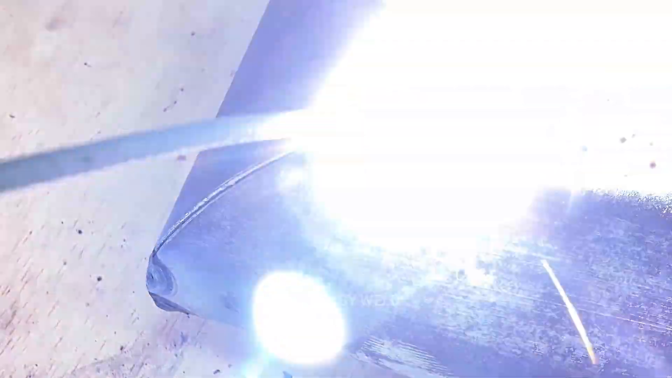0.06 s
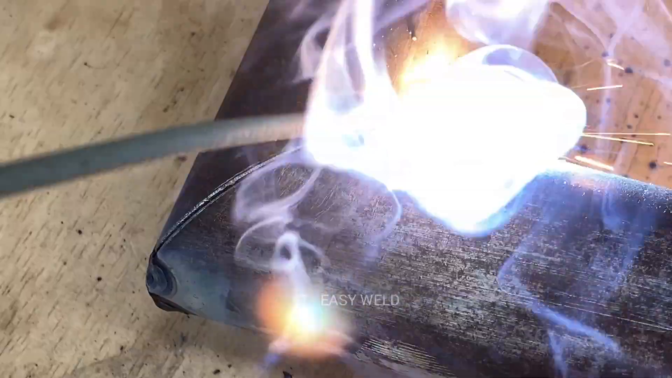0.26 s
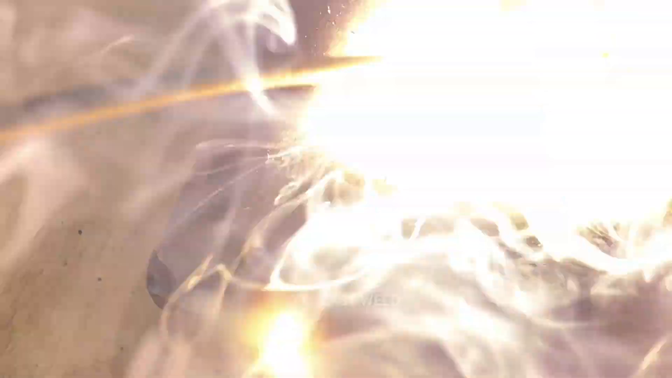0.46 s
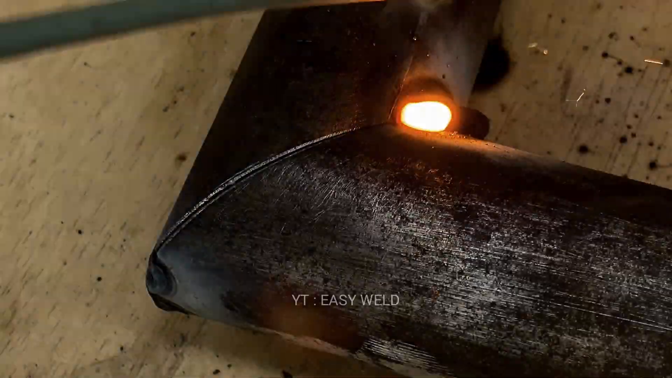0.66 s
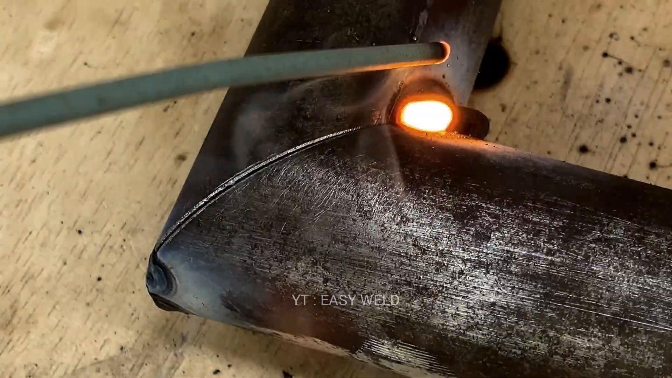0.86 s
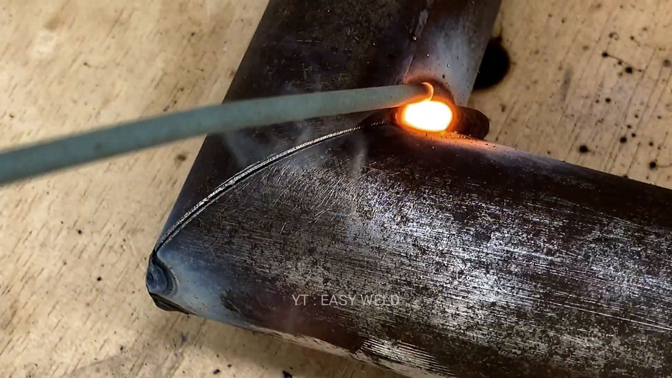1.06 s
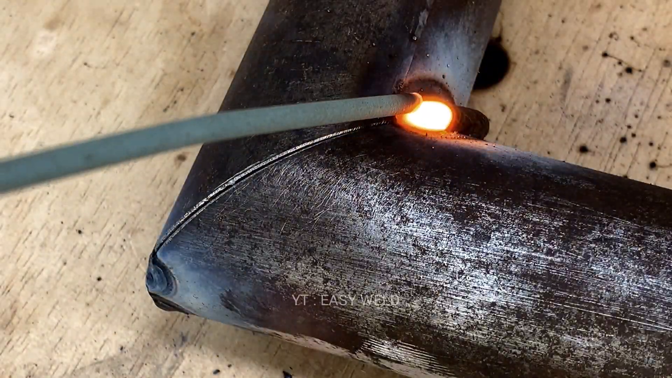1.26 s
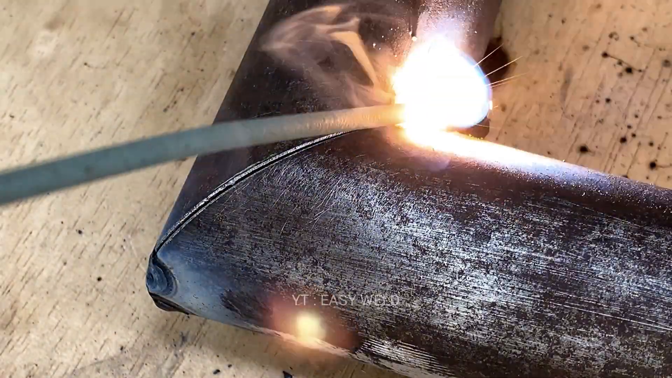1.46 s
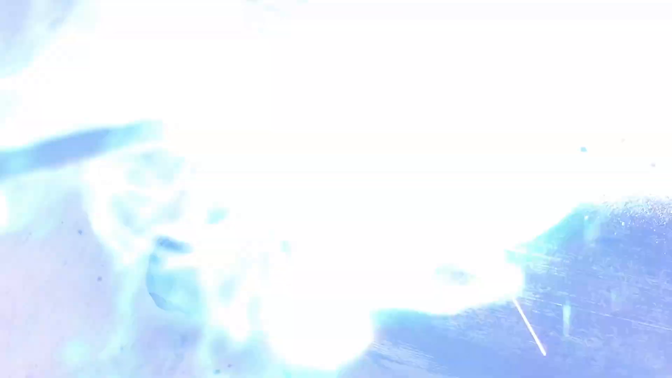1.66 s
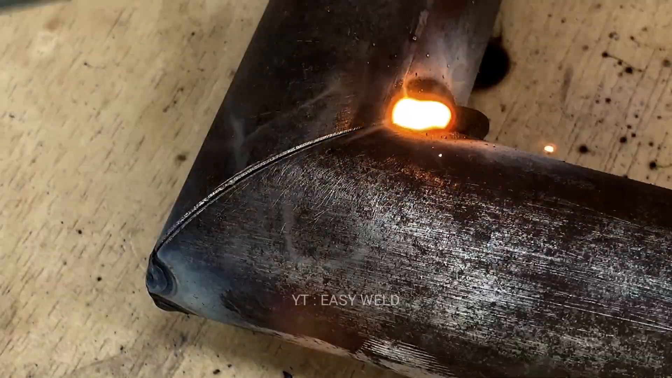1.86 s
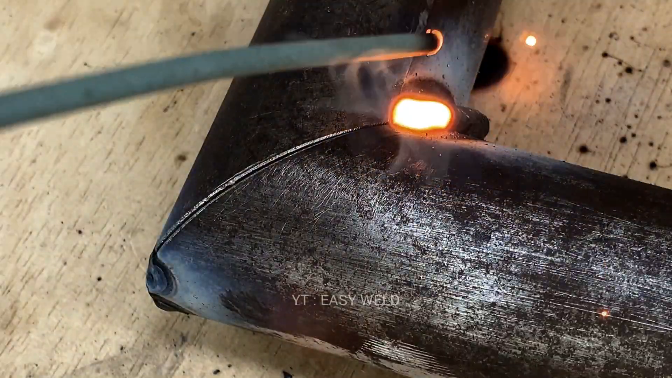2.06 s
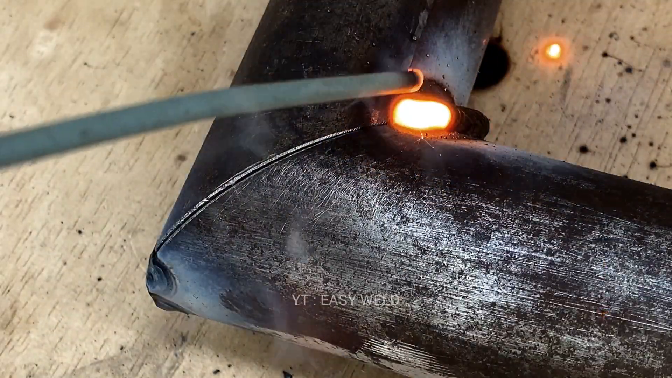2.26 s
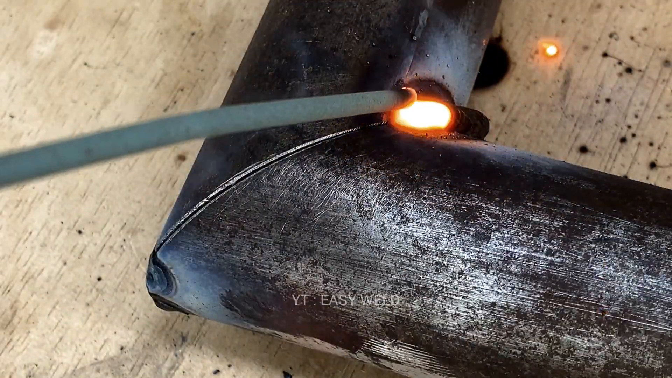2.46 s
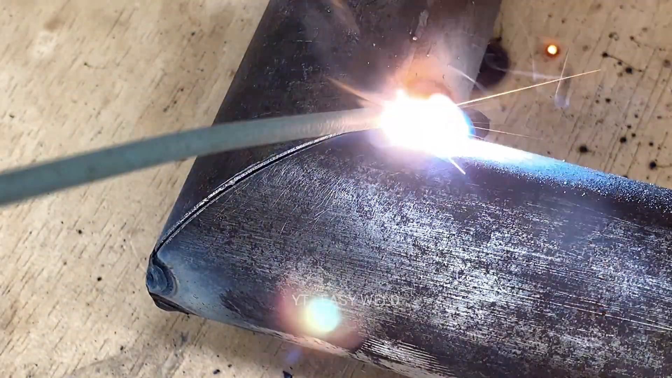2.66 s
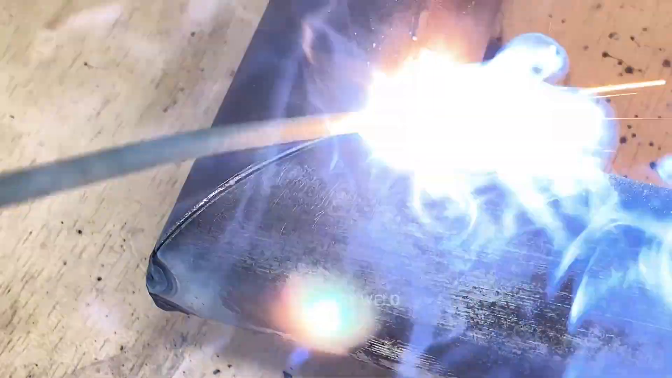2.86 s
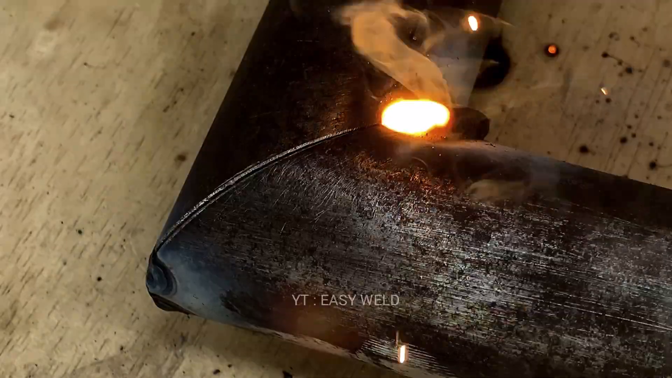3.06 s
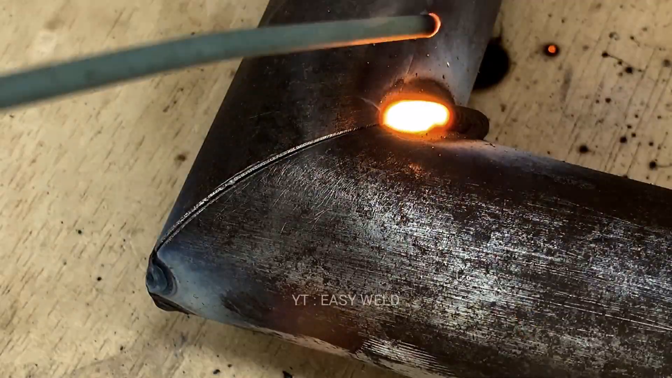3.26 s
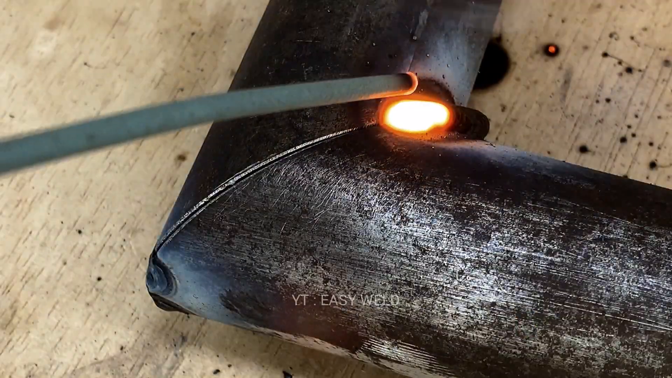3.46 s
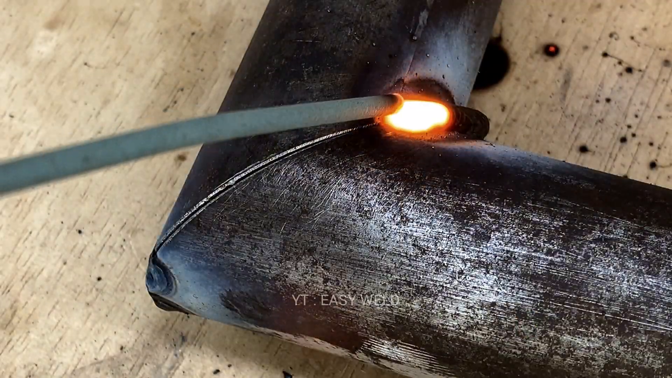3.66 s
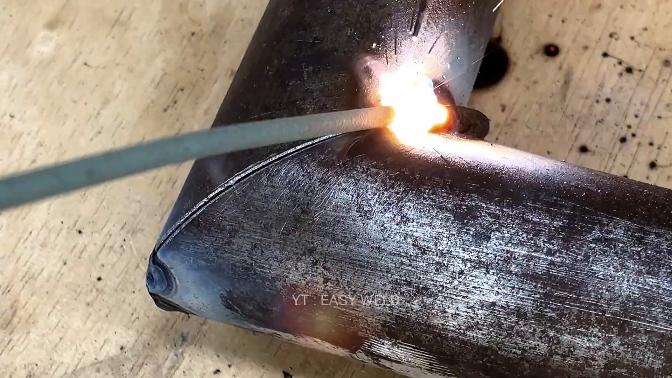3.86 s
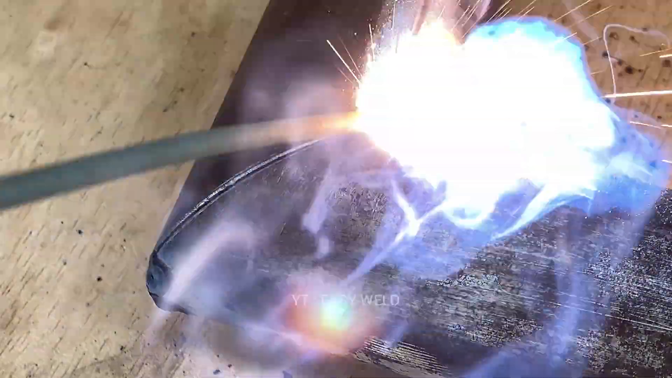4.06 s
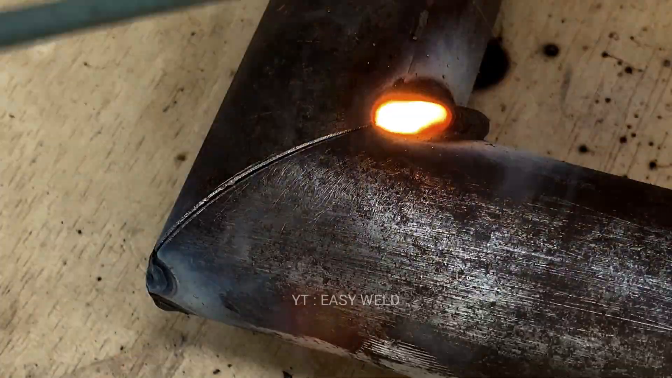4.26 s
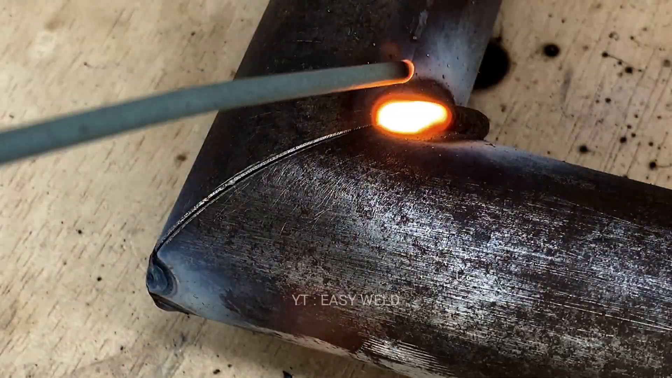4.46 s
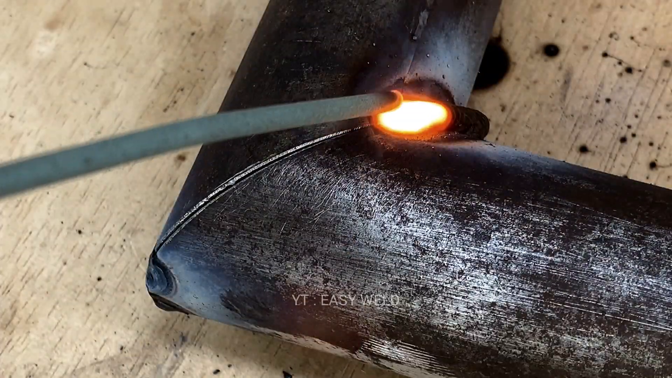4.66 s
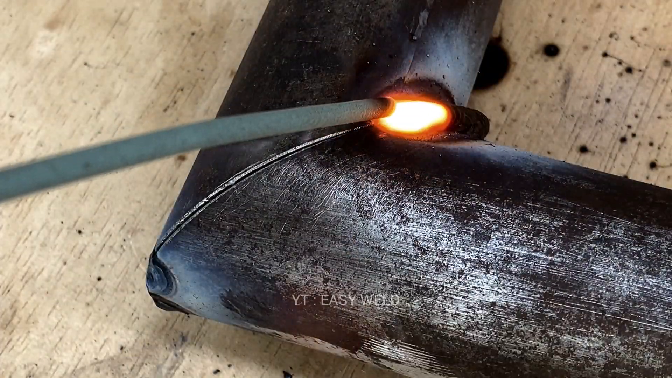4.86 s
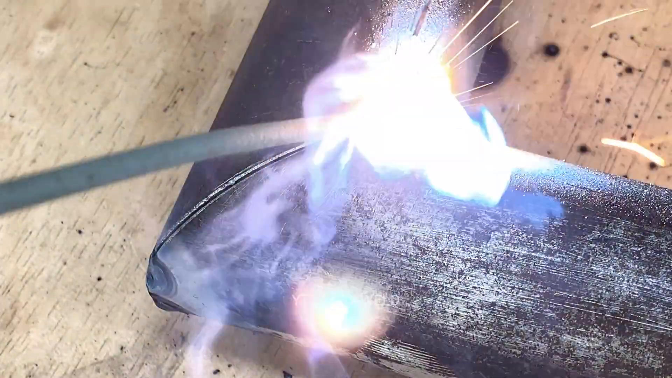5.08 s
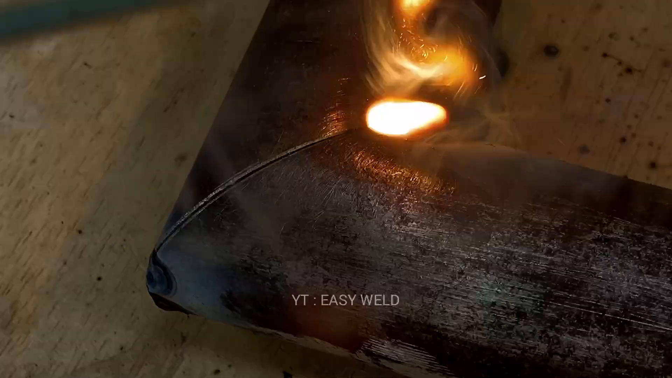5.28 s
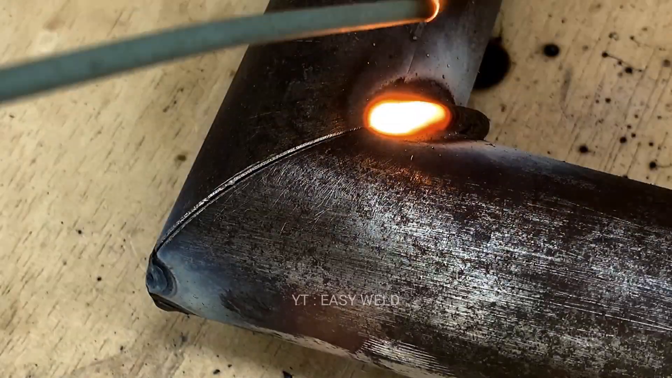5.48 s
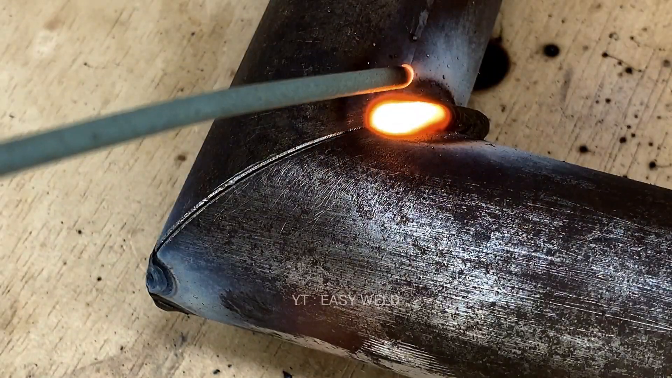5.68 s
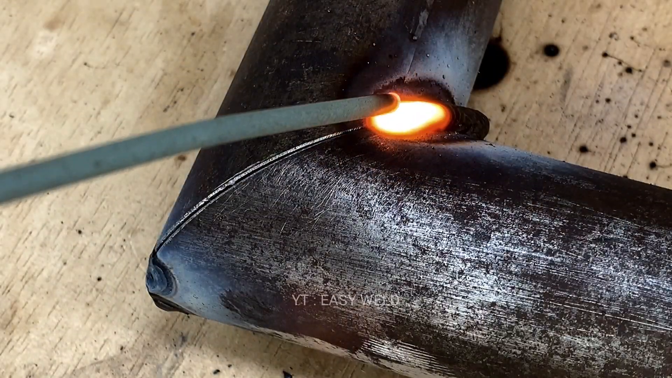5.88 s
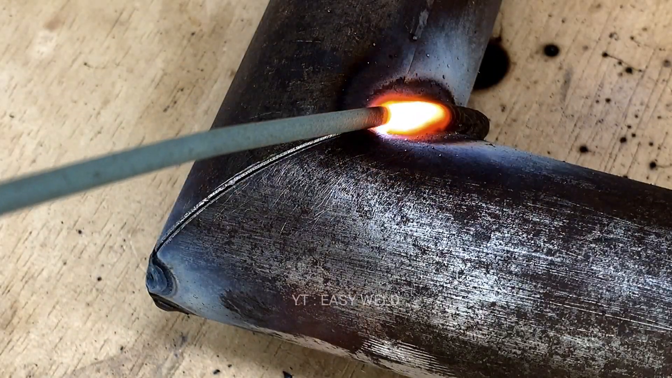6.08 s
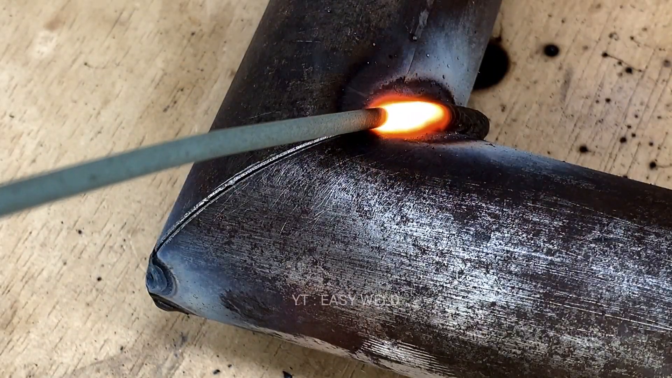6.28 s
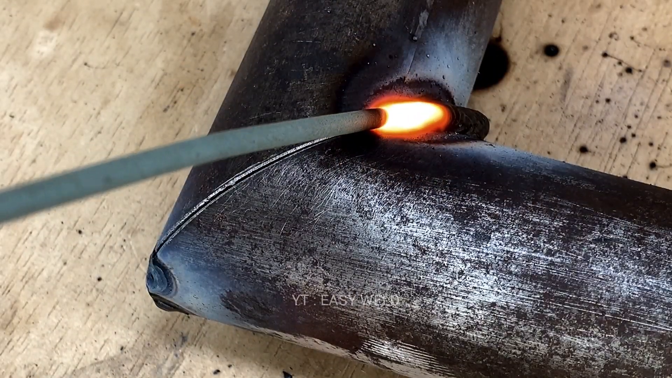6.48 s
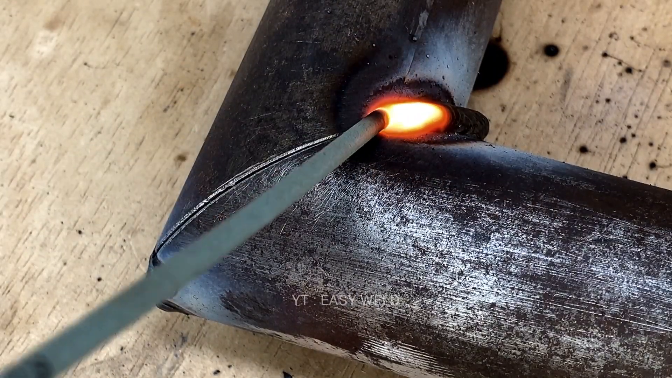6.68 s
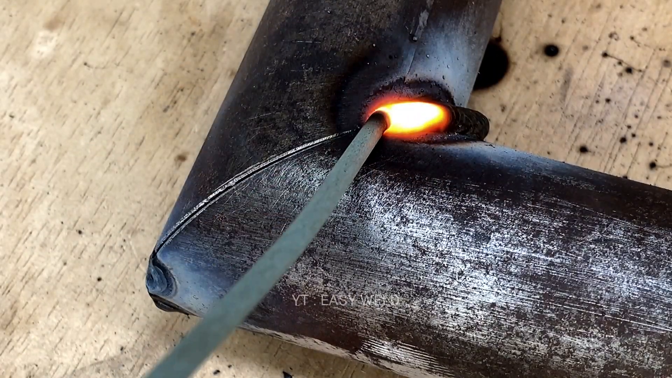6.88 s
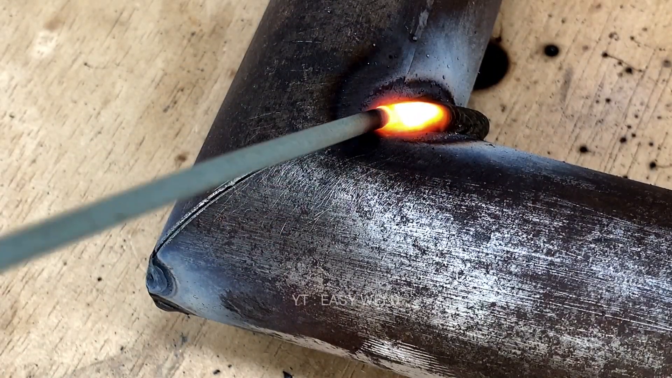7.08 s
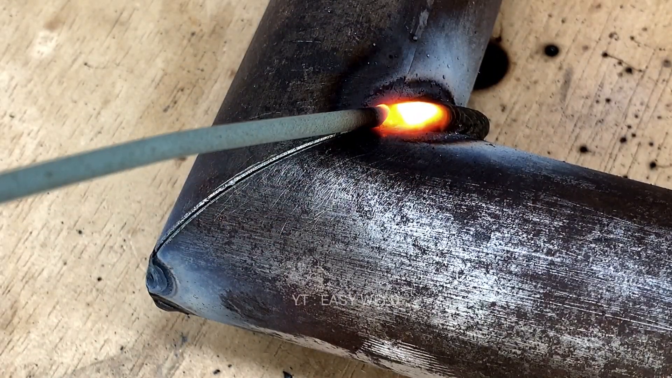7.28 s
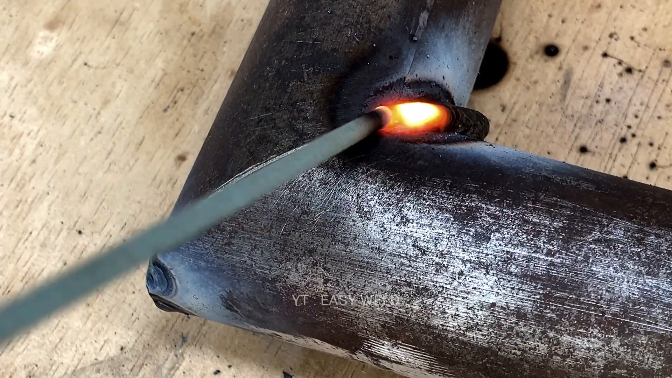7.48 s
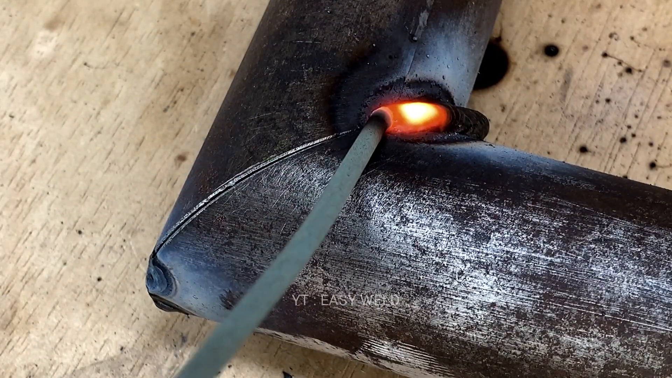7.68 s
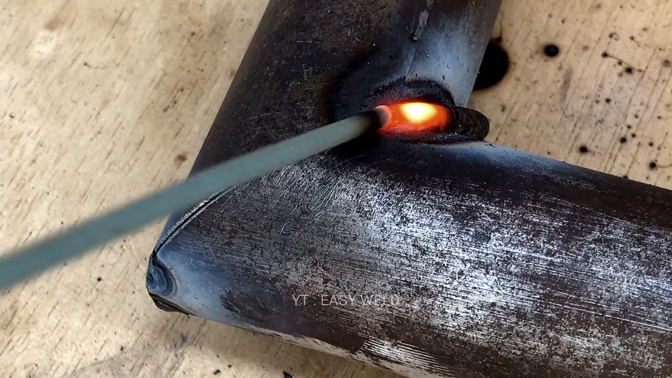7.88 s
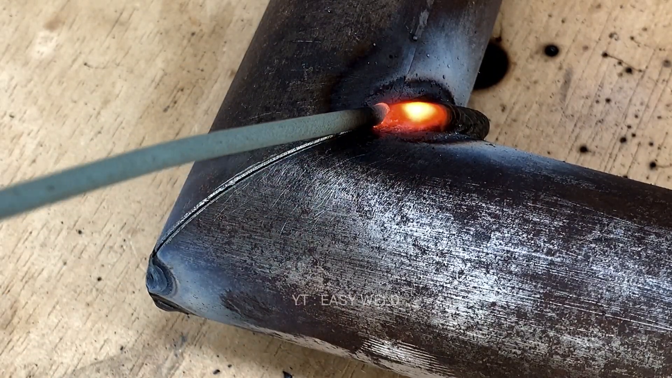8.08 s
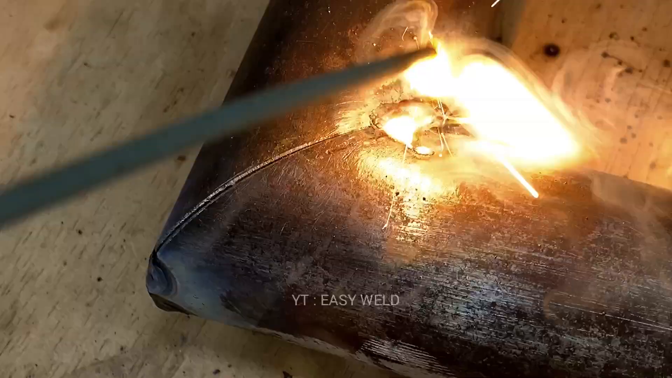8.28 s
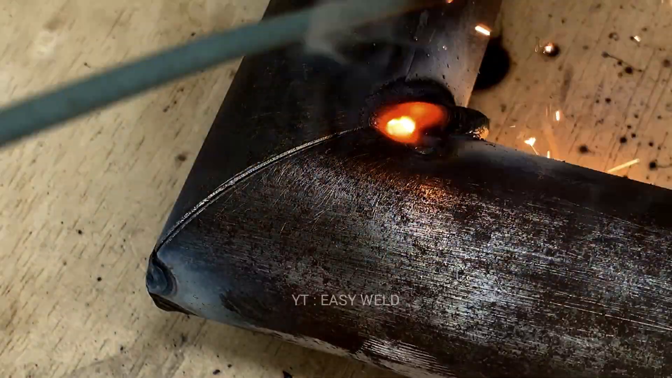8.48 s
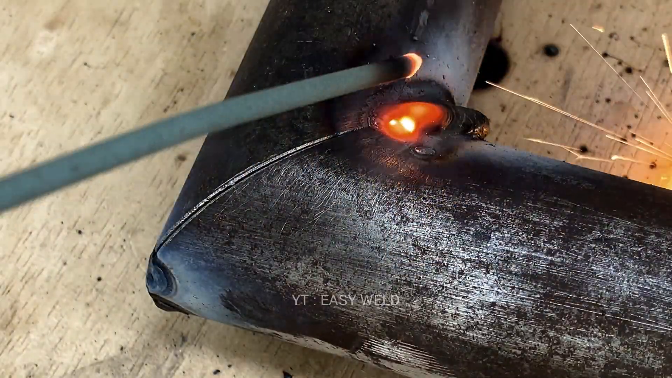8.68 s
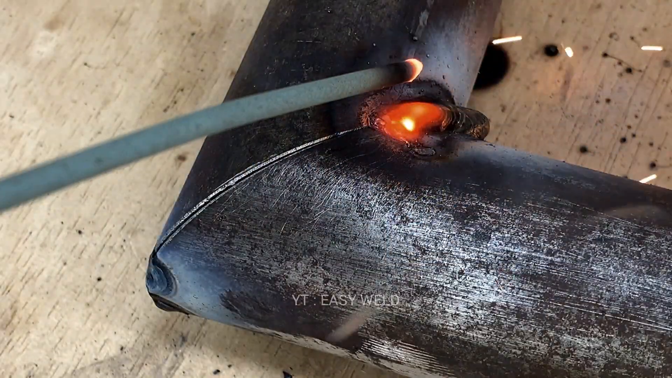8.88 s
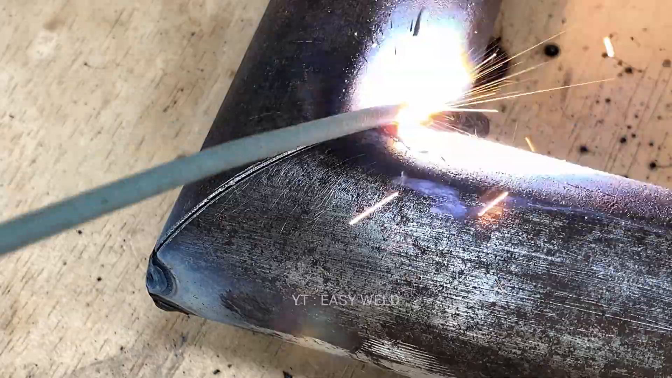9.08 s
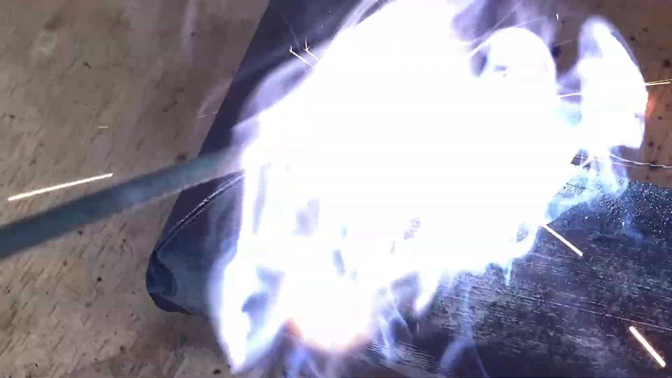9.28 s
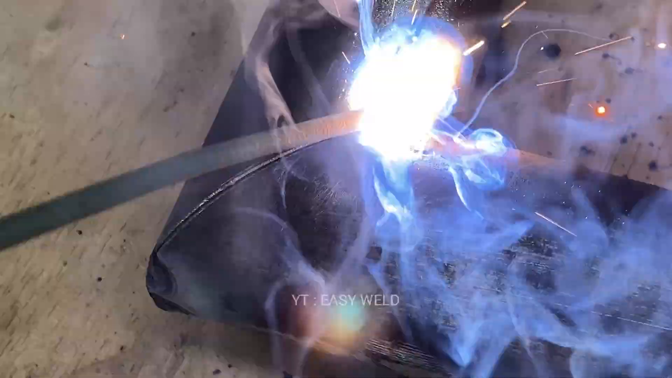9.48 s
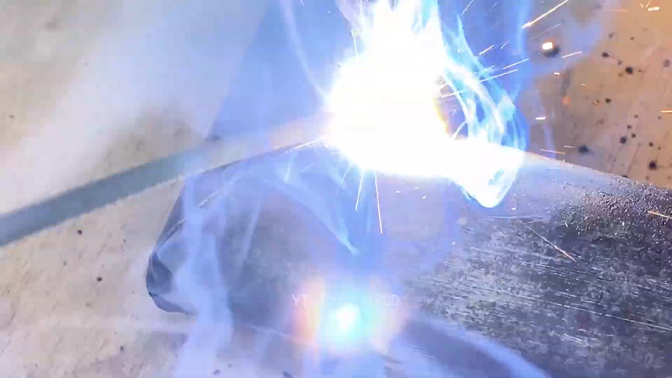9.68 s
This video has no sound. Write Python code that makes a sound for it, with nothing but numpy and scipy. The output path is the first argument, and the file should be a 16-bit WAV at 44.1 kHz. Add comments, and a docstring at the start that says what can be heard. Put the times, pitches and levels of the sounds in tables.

```python
"""Stick welding in a workshop

A rod is touched to steel eight times close to a phone. Each arc is coloured noise roughened by tiny spits, with
short sharp noise pops. Low puffs come as most arcs end, and fine noise sizzles as slag. The rod knocks, cooling
slag ticks and a far bird chirps in gliding sines. Behind lie a resonant noise drone, fan tones, a brief whine and
a low wandering rumble."""
import sys
import numpy as np
from scipy import signal
from scipy.fft import rfft, irfft, next_fast_len
from scipy.io import wavfile
from scipy.ndimage import uniform_filter1d

SR = 44100
rng = np.random.default_rng(int(sys.argv[2]) if len(sys.argv) > 2 else 0)


def wav_out(sig):
    """Save sig, one row per channel (or a flat mono array), as 16-bit PCM at SR to the path in sys.argv[1]."""
    wavfile.write(sys.argv[1], SR, np.round(np.clip(np.atleast_2d(sig).T, -1, 1) * 32767).astype(np.int16))


N = 429534
SIZE = next_fast_len(N + 4096)  # transform length, with room for filter tails
HZ = np.arange(SIZE // 2 + 1) * SR / SIZE
T = np.arange(N) / SR

# Each arc touches and sputters, catches and burns, flares as the rod lifts, and breaks:
# strike t/s; catch, flare, break t/s after it; strike burst, touch, burn, late, flare level/dB before colouring;
# brightness/dB
ARC_STAGES = [(0, 0.15, 0.39, 0.51, -25, -22.5, -17.5, -18, -17, -2.5),
              (1.364, .14, 0.31, .348, -28, -27, -23.5, -25.5, -18, -2),
              (2.592, .11, .398, .424, -34, -28, -24, -19, -18.5, -1),
              (3.809, 0.14, 0.27, .321, -26, -27.5, -20, -20, -15.5, -3),
              (4.958, 0.085, .255, 0.28, -31, -28, -23, -20.5, -15.5, -2),
              (6.079, 0.0082, .037, 0.045, -24.5, -27, -28, -31, -37, 1),
              (8.092, .05, .115, .17, -5.5, -23.5, -16.5, -21.5, -16, -5),
              (9.069, .15, .612, .651, -24, -20, -15.5, -23, -17, -6.5)]
# Pops of droplets and of the arc snapping back, with a few faint lone ticks after the arcs:
# start t/s, peak level/dB before tilt, treble over bass/dB
MAIN_POPS = [(0.0518, -5, -8), (0.1062, -11, 0), (0.173, -7, 0), (0.1781, 0.5, 1), (0.1995, -2.5, 3),
             (0.2433, -13, 0), (0.2818, -9, 0), (0.3031, -3, 1), (0.3413, -4, 4), (0.3611, -4, 0),
             (0.388, -7, 0), (0.4265, 0, 0), (0.4524, -8, 0), (0.4646, -6, 0), (0.4833, -12.5, -3),
             (0.636, -26, -10), (1.3692, -7, -7), (1.3834, -7.5, 0), (1.3958, -3, 4), (1.415, -10, 5),
             (1.4257, -6.5, 5), (1.4384, -12, 2), (1.4865, -13, -3), (1.4974, -13, 0), (1.5349, -8, 0),
             (1.5402, -4.5, 1), (1.5466, -0.5, 1.5), (1.5724, -11, 0), (1.5805, -2, 1), (1.5874, -11, 0),
             (1.6257, -10, 0), (1.6383, -1.5, -1), (1.6628, -9.5, -9), (1.672, -10, -11), (1.6995, -17, -8),
             (1.97, -34, 2), (2.599, -15, 0), (2.6164, -15, 0), (2.686, -14, 0), (2.6949, 0.5, -8),
             (2.7157, -5.5, 2), (2.7304, -14, 0), (2.7397, -4, 4), (2.7468, -9, 0), (2.7636, -9, 0),
             (2.7714, -11, 0), (2.7796, -4, 2), (2.821, -11, 4), (2.8408, -5, 5), (2.8848, -3, 0),
             (2.9016, -4, 3), (2.9477, 0, -2), (2.9839, -4, -0.5), (3.0086, -18, -5), (3.8324, -16, 4),
             (3.8681, -5.5, 4), (3.8784, -5.5, 0), (3.9065, -0.5, -6), (3.9174, -5.5, 0),
             (3.9559, -0.5, 1.5), (3.9967, -1, -4), (4.0004, -11, 0), (4.009, -2, -3), (4.0612, -8, -2),
             (4.0864, -6, 0), (4.6463, -35, -2), (4.9638, -16, -2), (4.9735, -4.5, 3), (5.025, -1.5, 0),
             (5.0484, -4, 0), (5.0652, -3, 0), (5.0913, -5, 2), (5.109, -10, 0), (5.128, -11, 0),
             (5.1348, -7, 0), (5.1637, -9, -3), (5.1729, -7, 3), (5.1826, -2, -1), (5.258, -20, -4),
             (6.0931, -7, 3), (6.1024, -11, -3), (6.115, -9, 3), (8.093, 2.5, -3), (8.1124, -8, -2),
             (8.1464, -1, 2), (8.1684, -16, 0), (8.2275, -3, -6), (8.2661, -16, -11), (8.2701, -18.5, -16),
             (8.4053, -31, -2), (9.0756, -9, -1), (9.1015, -13, 2), (9.1217, -14, 0), (9.1616, -10, -5),
             (9.1995, -7, -2), (9.227, 0, -2), (9.243, -3, -3), (9.2525, -2, -8), (9.2644, -3.5, -6),
             (9.3374, -2, -4), (9.3442, -2, 4), (9.397, -13, -2), (9.416, -13, 0), (9.4564, 1, -3),
             (9.4984, -4, -2), (9.5532, -13, 0), (9.5723, -2, 1), (9.6001, -7, 6), (9.625, -10, 3),
             (9.651, -1.5, 4), (9.6763, -2.5, 3), (9.7094, -22, 0)]


def undb(db):
    """Decibels to gain."""
    return 10 ** (np.asarray(db) / 20)


def level(x, db):
    """Scale to an rms level in dB."""
    return x * undb(db) / np.sqrt(np.mean(x ** 2))


def shape_db(table):
    """Read a table of f/Hz, level/dB on every frequency bin, along log frequency."""
    hz, db = np.transpose(table)
    return np.interp(np.log(HZ + 1), np.log(hz), db)


def causal(db):
    """Minimum-phase response with the given dB gain, from the folded cepstrum."""
    cepstrum = irfft(db * np.log(10) / 20, SIZE)
    cepstrum[1:SIZE // 2] *= 2
    cepstrum[SIZE // 2 + 1:] = 0
    return np.exp(rfft(cepstrum))


def through(x, response):
    """Filter by a frequency response."""
    return irfft(rfft(x, SIZE) * response, SIZE)[..., :N]


def band(x, lo_hz, hi_hz):
    """Gentle band-pass."""
    return signal.sosfilt(signal.butter(2, [lo_hz, hi_hz], "band", fs=SR, output="sos"), x)


def walk(rate):
    """Random levels held 1 / rate s and slewed twice; spread near 1."""
    k = int(SR / rate)
    steps = np.repeat(rng.standard_normal(N // k + 1), k)
    return 1.196 * uniform_filter1d(uniform_filter1d(steps, k), k)[:N]


def tone(hz):
    """Sine that follows a pitch curve in Hz."""
    return np.sin(2 * np.pi * np.cumsum(hz) / SR)


def add(out, s, sound):
    """Mix a sound in at a time in s."""
    i = max(int(s * SR), 0)
    out[i:i + len(sound)] += sound[:N - i]


def drone(drone_db=-39.5, waver_db=.4):
    """Fan and machine noise ringing in room and casing resonances: a common and a scattered part."""
    # Drone between its resonances: f/Hz, level/dB
    floor = [(30, -21), (60, -11.5), (120, -12.5), (160, -11), (300, -10.5), (400, -17.5), (700, -10),
             (800, -17.5), (1150, -19.5), (2050, -22.5), (2800, -27), (5500, -28), (7300, -35),
             (10700, -45), (12000, -48.5), (15500, -51)]
    # Room and casing resonances: f/Hz, width/Hz, rise/dB
    modes = [(220.4, 56, 12.5), (358.6, 16, 8), (404, 32, -13.5), (488.6, 130, 12.5), (617.5, 44, 4),
             (957, 133, 11.5), (1400, 30, -5.5), (1656, 112, 12.5), (1913, 62, 7.5), (2370, 117, 8.5),
             (3166, 120, 8.5), (4300, 65, 3.5), (4880, 360, 6.5), (6070, 150, 4.5), (6480, 340, 5.5),
             (10370, 1700, 8.5)]
    db = shape_db(floor)
    for hz, width, rise_db in modes:
        db = db + rise_db / (1 + (2 * (HZ - hz) / width) ** 2)
    noise = through(rng.standard_normal((2, N)), undb(db))
    return level(noise, drone_db) * undb(waver_db * walk(5))


def fan_tones():
    """Blade tones of the fan: steady sines whose pitch wanders by about 1 Hz."""
    # Blade tones: f/Hz, rms level/dB
    lines = [(706, -66), (1412, -72), (2383, -75)]
    return sum(level(tone(hz + walk(3.71)), db) for hz, db in lines)


def rumble(throb_db=3):
    """Low throbbing sine whose pitch wanders as it comes and goes."""
    # Rumble curve: t/s, f/Hz, rms level/dB
    curve = [(0, 71.8, -53), (.73, 72.7, -49.5), (1.52, 74, -50), (2.36, 73, -56.5), (3.03, 64, -51),
             (3.5, 63.7, -57.5), (4.5, 70, -55), (5.6, 59.95, -58), (8.4, 60, -53), (8.7, 62, -63),
             (9.3, 87.9, -49.5), (9.74, 85.9, -54)]
    s, hz, db = np.transpose(curve)
    wander = np.interp(T, s, hz) * (1 + .06 * walk(12))
    throb = level(undb(throb_db * walk(12)) * tone(wander), 0)
    return throb * undb(np.interp(T, s, db))


def spits(rate, size_db, scatter_db, tail_s):
    """Noise roughened by a rain of tiny spits, most small and a few large, each smeared by a short tail."""
    sizes = undb(size_db + abs(scatter_db) * rng.exponential(size=N))
    hits = (rng.random(N) < rate / SR) * sizes
    swell = 1 + signal.lfilter([1], [1, -np.exp(-1 / (tail_s * SR))], hits)
    return level(swell * rng.standard_normal(N), 0)


def burning(strike_s=0.012, catch_s=0.024, sag_s=0.14, flare_s=0.031, break_db=-13, dip_s=.006, dip_db=-2.5):
    """Hiss level and brightness in dB through every arc: a short arc is bright, a stretched one dull."""
    # A droplet bridges the gap and the hiss sinks: t/s, length/s, depth/dB
    shorts = [(0.032, 0.0081, -8.5), (1.44, .005, -13), (1.633, .005, -11), (2.645, 0.011, -17),
              (2.824, 0.0163, -23), (8.171, 0.013, -17)]
    hiss_db, bright_db = np.full(N, -120.), np.zeros(N)
    for strike, catch, flare, end, strike_db, touch_db, burn_db, late_db, flare_db, bright in ARC_STAGES:
        on = (T >= strike) & (T <= strike + end)
        t = T[on] - strike
        rise = max(flare - flare_s, catch)
        # touch, burn, sag to the late level, hold, flare, break
        times = [catch - catch_s, catch, min(catch + sag_s, rise), rise, flare, end]
        levels = [touch_db, burn_db, late_db, late_db, flare_db, flare_db + break_db]
        steady = undb(np.interp(t, times, levels))
        burst = undb(strike_db) * np.exp(-(t / strike_s) ** 2)
        hiss_db[on] = 10 * np.log10(steady ** 2 + burst ** 2)
        bright_db[on] = bright + np.interp(t, times, [2, 0, 0, 0, -5, -10])
    for s, length, depth_db in shorts:
        hiss_db += depth_db * np.clip(np.minimum(T - s, s + length - T) / .0015 + .5, 0, 1)
    # the hiss sinks just before each main pop, by dip_db for a pop of 0 dB
    for s, db, _ in MAIN_POPS:
        i = int(s * SR)
        hiss_db[i - int(dip_s * SR):i] += dip_db * undb(db)
    return hiss_db, bright_db


def crackle(bright_db, per_s=30, top_db=-12.5, mean_fall_db=4, tint_spread_db=2):
    """Smaller pops at chance moments from strike to flare: rows of t/s, peak level/dB, brightness/dB."""
    rows = []
    for strike, _, flare, *_ in ARC_STAGES:
        when, size, tint = rng.random((int(per_s * flare), 3)).T
        s = strike + when * flare
        tint_db = bright_db[(s * SR).astype(int)] + tint_spread_db * (2 * tint - 1)
        rows += zip(s, top_db + mean_fall_db * np.log(size), tint_db)
    return rows


def pop_layers(pops, colour, swell_s=0.00035, snap_s=0.00039, fizz_s=0.0099, fizz_db=-18, crack_db=11, thin_hz=1900):
    """Noise that swells quickly to one sharp crack, then a fizz; returns its bass and treble feeds."""
    lead = 44  # samples of swell before the crack
    t = T[:800] - lead / SR
    decay = np.exp(-t / snap_s) + undb(fizz_db) * np.exp(-t / fizz_s)
    envelope = np.where(t < 0, np.exp(t / swell_s), decay)
    # how high a unit click peaks once coloured, to allow for it in the pop levels
    crack_peak = np.max(np.abs(band(irfft(colour, SIZE), thin_hz, 19800)))
    low, high = np.zeros((2, N))
    for (s, db, bright), noise in zip(pops, rng.standard_normal((len(pops), len(t)))):
        snap = envelope * noise + (t == 0) * np.sign(noise) * undb(crack_db)
        snap *= undb(db) / np.max(np.abs(snap)) / crack_peak
        add(low, s, snap * undb(-bright / 2))
        add(high, s, snap * undb(bright / 2))
    return band(low, thin_hz, 20000), high  # so small a burst moves little bass


def arc(waver_db=0.96, flicker_db=2.0, split_hz=5960):
    """Hissing plasma and spitting metal share one colour, whose treble half opens and closes."""
    # Arc colour: f/Hz, level/dB
    arc_colour = [(60, -6.5), (500, -9), (1400, -8), (1900, -12.5), (2400, -7.5), (3600, -3), (4900, 0),
                  (5800, -2.5), (6600, 0), (7700, -6.5), (9000, -1), (10700, -1), (11700, -7.5),
                  (15500, -14.5)]
    hiss_db, bright_db = burning()
    unsteady_db = waver_db * walk(60) + flicker_db * walk(250)
    hiss = spits(700, 3.1, 3.32, 0.00016) * undb(hiss_db + unsteady_db)
    colour = causal(shape_db(arc_colour))
    low, high = pop_layers(list(MAIN_POPS) + crackle(bright_db), colour)
    low = low + hiss
    high = high + hiss * undb(bright_db)
    bass_share = 1 / (1 + (HZ / split_hz) ** 8)
    return through(low, colour * bass_share) + through(high, colour * (1 - bass_share))


def puffs(thump_hz=95, flutter_db=-5, roar_db=-7):
    """The flame collapses in a slow push of hot gas: a falling, fluttering thump under a rough roar."""
    # Puffs as the rod lifts: t/s (half a length after onset), drive level/dB, length/s, thump in it/dB
    puff_cues = [(0.472, -29.5, 0.042, -2), (1.687, -30.5, 0.032, -2), (2.998, -29, 0.02, 0),
                 (4.111, -27.5, 0.032, -11), (5.24, -31.5, .035, -1), (8.26, -28.5, 0.034, 1),
                 (9.7, -30, 0.027, 1)]
    out = np.zeros(N)
    for s, db, length, thump_db in puff_cues:
        t = T[:int(3 * length * SR)] / length
        swell = t * np.exp(1 - t) * np.exp(-.5 * t ** 2)
        # the pitch passes thump_hz near the top of the swell
        thump = np.sin(2 * np.pi * thump_hz * length * (1.23 * t - 0.173 * t ** 2))
        flutter = level(band(rng.standard_normal(len(t)), 76, 254), flutter_db)
        roar = level(band(rng.standard_normal(len(t)), 250, 700), roar_db)
        add(out, s - length / 2, undb(db) * swell * (undb(thump_db) * thump + flutter + roar))
    return out


def sizzle(flicker_db=1.0, fade_s=0.04):
    """Fine frying of the molten slag: bright noise full of tiny spits."""
    # Spells of sizzling: t/s, length/s, rms level/dB at first, change/dB until it stops
    spells = [(0.483, 0.25, -43.5, -13), (1.715, 0.23, -44.5, -12.5), (3.003, 0.25, -44.5, -10),
              (4.13, 0.18, -46.5, -6), (5.265, 0.24, -46.5, -6), (6.125, .05, -55, -6),
              (8.285, 0.3, -47, -9), (8.596, 0.43, -59, 6.5), (9.717, 0.11, -45, -9)]
    # Sizzle colour: f/Hz, level/dB
    fry_colour = [(1500, -8), (3000, -10), (5000, 3), (7000, -3), (10500, -3.5), (12500, -9), (15500, -17)]
    gain = np.zeros(N)
    for s, length, db, change_db in spells:
        fade = np.clip(np.minimum(T - s + 0.029, s + length - T) / fade_s, 0, 1)
        gain += undb(db + change_db * np.clip((T - s) / length, 0, 1)) * fade
    noise = through(spits(520, 2, 2, 0.00029), undb(shape_db(fry_colour)))
    return level(noise, 0) * gain * undb(flicker_db * walk(100))


def knocks(knock_hz=1200, knock_s=0.0014, fall_s=0.004):
    """The rod tip knocks on the steel: a short sine that falls in pitch."""
    # Knocks: t/s, envelope peak level/dB
    knock_cues = [(1.369, -21), (2.695, -26), (9.076, -22.5)]
    out, t = np.zeros(N), T[:600]
    knock = t / knock_s * np.exp(1 - t / knock_s) * tone(knock_hz * np.exp(-t / fall_s))
    for s, db in knock_cues:
        add(out, s, undb(db) * knock)
    return out


def ticks(tick_s=0.0019):
    """Cooling slag ticks, thin and high: decaying noise in a treble band."""
    # Ticks: t/s, level/dB before the band-pass
    tick_cues = [(3.27, -45), (3.288, -48), (7.03, -38), (7.09, -47), (7.725, -32), (8.944, -29.5)]
    out, t = np.zeros(N), T[:600]
    for s, db in tick_cues:
        noise = rng.standard_normal(len(t)) * np.exp(-t / tick_s)
        add(out, s, undb(db) * band(noise, 8500, 13500))
    return out


def bird(blur=1.0, echo_s=.025):
    """Far chirps, gliding sines blurred by moving air and trailing an echo."""
    # Chirps: t/s, length/s, start f/Hz, end f/Hz, level/dB before blur and echo
    chirp_cues = [(4.6, .04, 4600, 5600, -52), (5.77, .055, 4200, 6000, -48), (5.83, .04, 5800, 5800, -54),
                  (6.4, .045, 4700, 5600, -50), (7.275, .035, 4500, 5700, -50),
                  (7.31, .02, 5200, 4600, -54)]
    out = np.zeros(N)
    for s, length, start_hz, end_hz, db in chirp_cues:
        n = int(length * SR)
        glide = start_hz + (end_hz - start_hz) * np.sin(np.linspace(0, np.pi / 2, n)) ** 2.2
        swell = np.hanning(n) ** .5 * np.linspace(.3, 1.1, n)
        add(out, s, undb(db) * swell * tone(glide))
    echo = rng.standard_normal(4000) * np.exp(-T[:4000] / echo_s)
    echo /= np.sqrt(np.sum(echo ** 2))
    return out * (1 + blur * walk(400)) + signal.fftconvolve(out, echo)[:N]


def whine(throb_db=3):
    """A thin throbbing sine of unsteady pitch that comes and goes once."""
    # Whine: start t/s, end t/s, f/Hz, rms level/dB between its fades
    whine_cue = (5.45, 6.1, 5080, -66)
    start, end, hz, db = whine_cue
    fade = np.clip(np.minimum(T - start, end - T) / .1, 0, 1)
    return fade * level(undb(throb_db * walk(40)) * tone(hz + 15 * walk(30)), db)


def smear(near, bench_s=0.00076, bench_db=-19):
    """Bench and walls throw the near sounds back as a short burst of dense echo."""
    bench = rng.standard_normal(3000) * np.exp(-T[:3000] / bench_s)
    bench *= undb(bench_db) / np.sqrt(np.sum(bench ** 2))
    return band(signal.fftconvolve(near, bench)[:N], 250, 22000)


def scene():
    """All sources reach two ports a short way apart; scattered sound reaches them with opposite sign."""
    # Stereo phase of the scene: f/Hz, lead of the left/rad
    stereo_phase = [(0, 0), (690, 0.1), (1460, 0.9), (1980, 0.1), (7410, -0.1), (8700, -2.8), (10900, -6.0),
                    (11600, -6.7), (12900, -9.2), (13700, -9.6), (14900, -12.5), (15800, -12.6),
                    (16300, -13.3), (16500, -12.8)]
    # Stereo balance: f/Hz, left minus right level/dB
    stereo_balance = [(110, -.5), (200, 3), (400, 1.5), (1300, 1.5), (2000, 0)]
    # Gain of the scattered drone: f/Hz, level/dB
    scatter_gain = [(60, -17.5), (300, -11), (800, -9.5), (1400, -1.5), (2300, -29), (3200, -12.5),
                    (6500, -80), (9000, -34), (15000, -2)]
    common, scattered = drone()
    common = common + fan_tones() + rumble() + whine()
    near = arc() + puffs() + sizzle() + knocks() + ticks() + bird()
    mid = near + common
    side = smear(near) + through(scattered, undb(shape_db(scatter_gain)))
    # each side takes half of the balance and phase
    phase = np.interp(HZ, *np.transpose(stereo_phase))
    half = undb(shape_db(stereo_balance) / 2) * np.exp(.5j * phase)
    return np.array([through(mid + side, half), through(mid - side, 1 / half)])


def record(dry, bass_hz=32, ceiling=.72, top_hz=15900):
    """The phone drops the deepest bass, rounds the loudest peaks and cuts the top steeply."""
    dry = signal.sosfilt(signal.butter(2, bass_hz, "high", fs=SR, output="sos"), dry)
    steep = signal.ellip(12, .2, 100, top_hz, fs=SR, output="sos")
    return signal.sosfilt(steep, ceiling * np.tanh(dry / ceiling))


dry = scene()
out = record(dry)
wav_out(out)
```